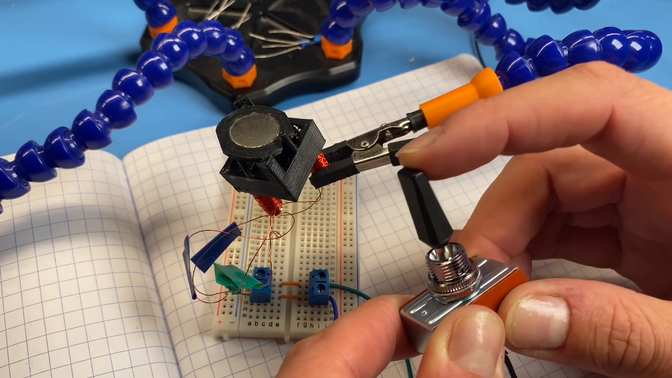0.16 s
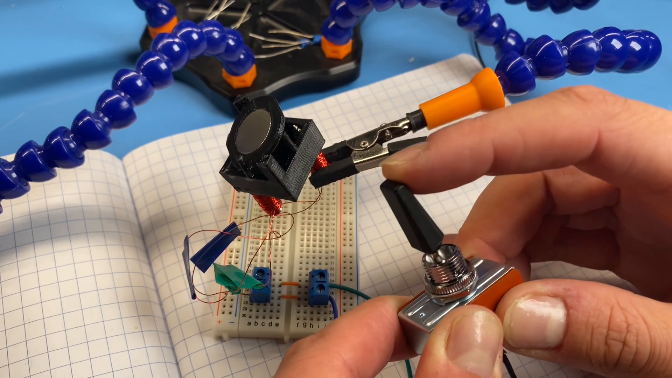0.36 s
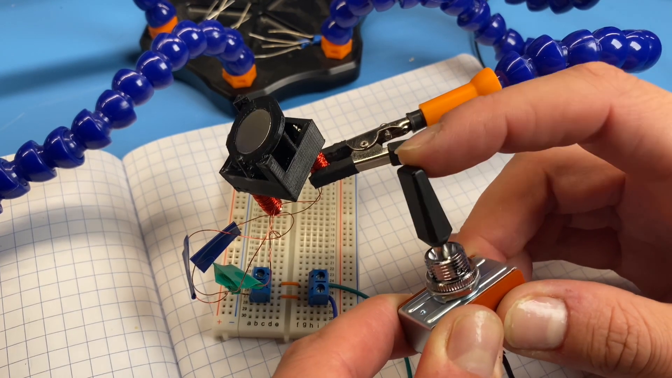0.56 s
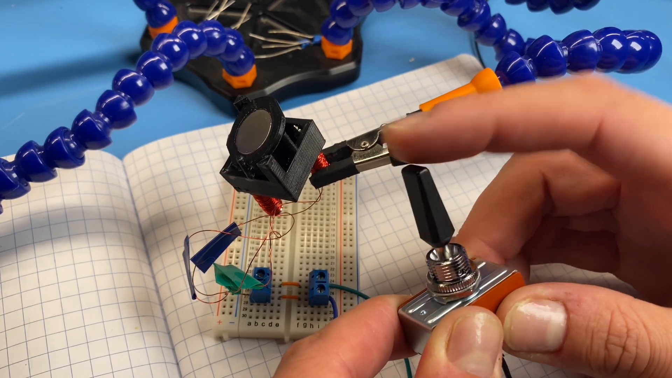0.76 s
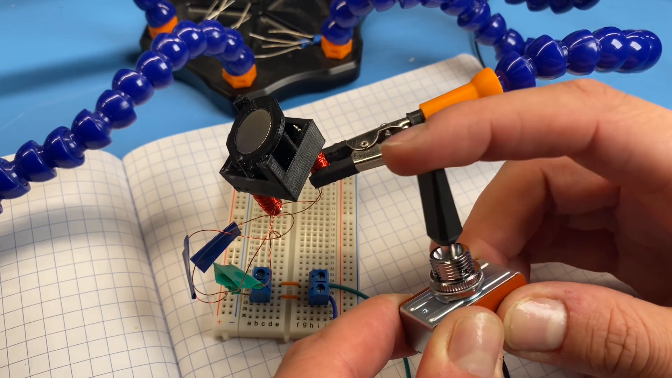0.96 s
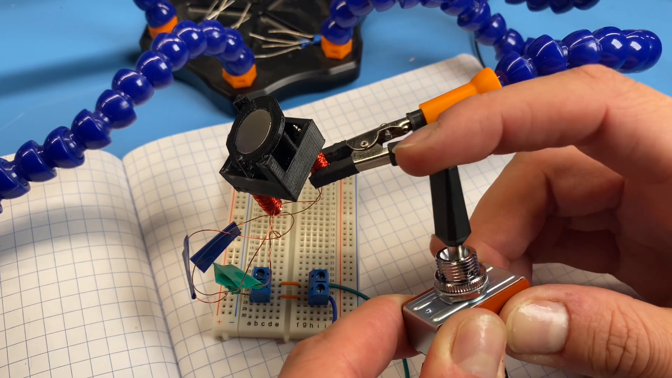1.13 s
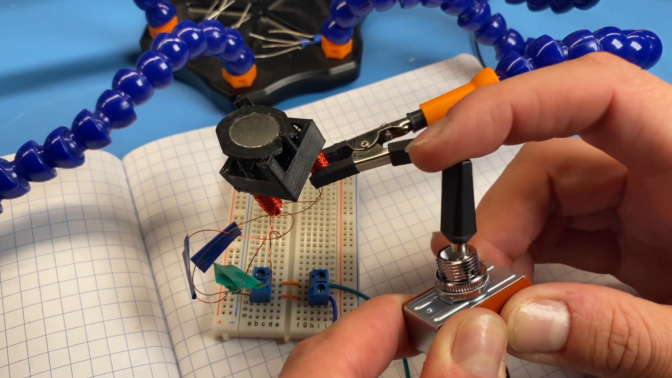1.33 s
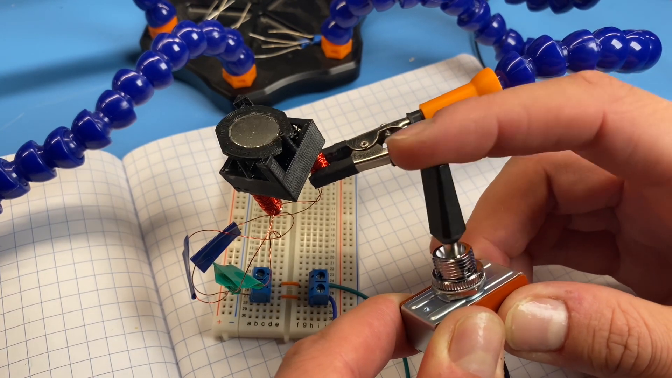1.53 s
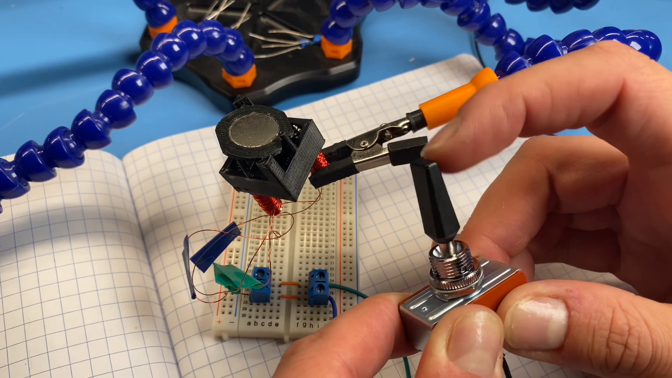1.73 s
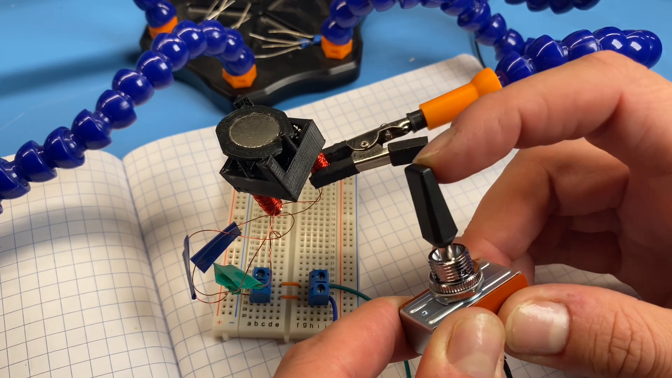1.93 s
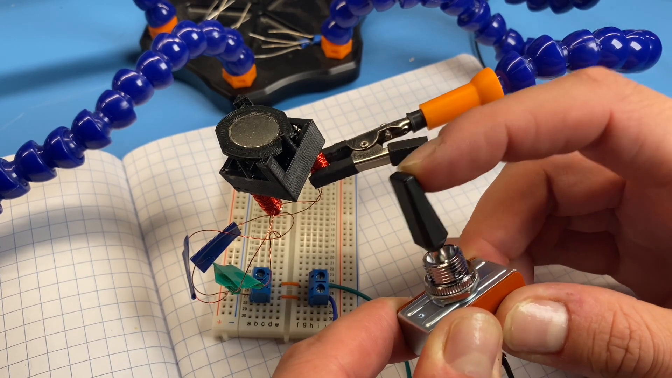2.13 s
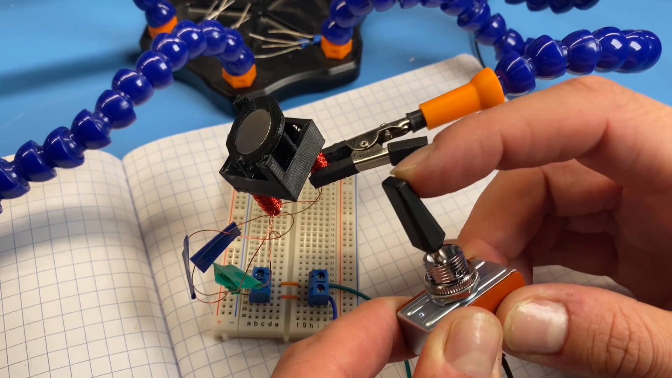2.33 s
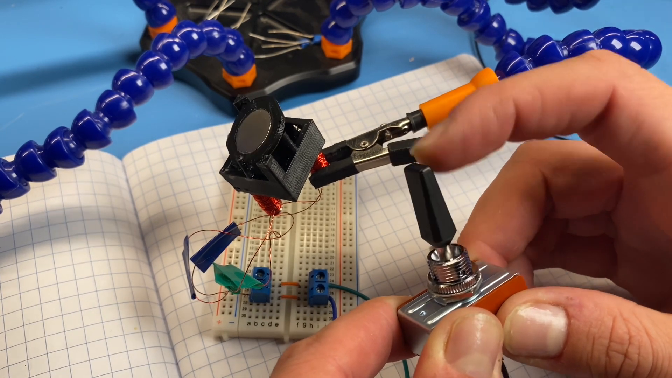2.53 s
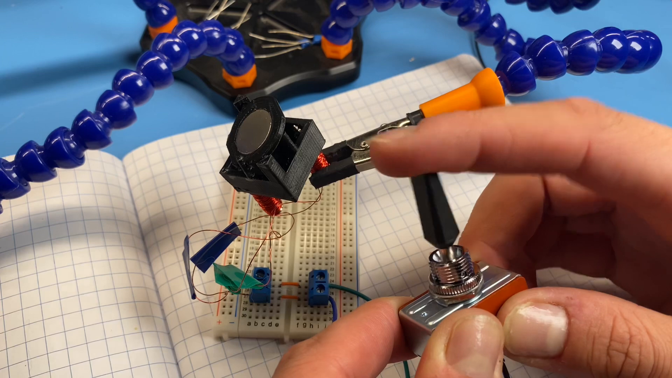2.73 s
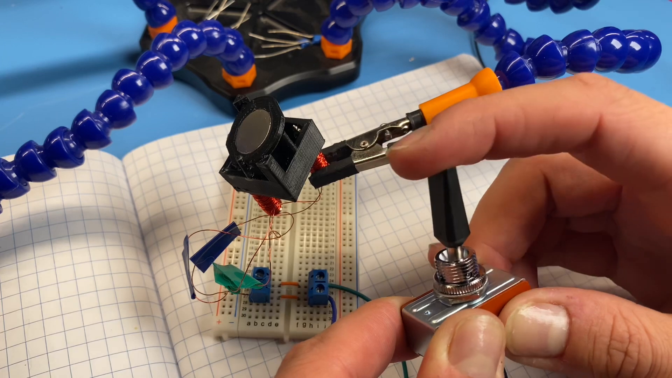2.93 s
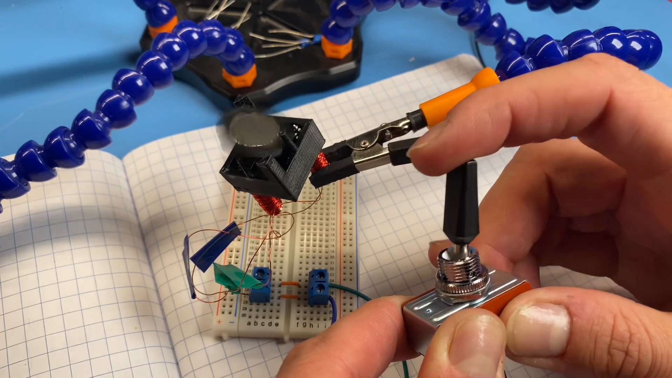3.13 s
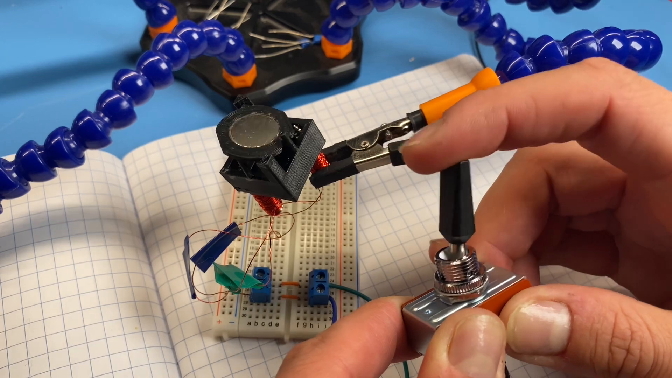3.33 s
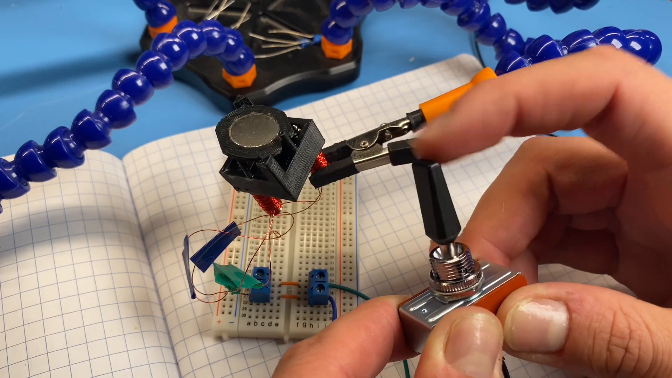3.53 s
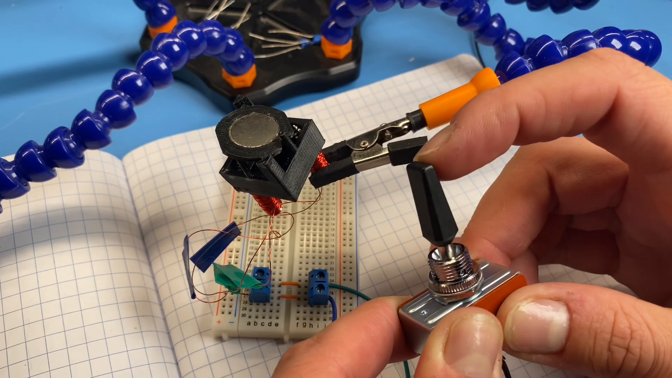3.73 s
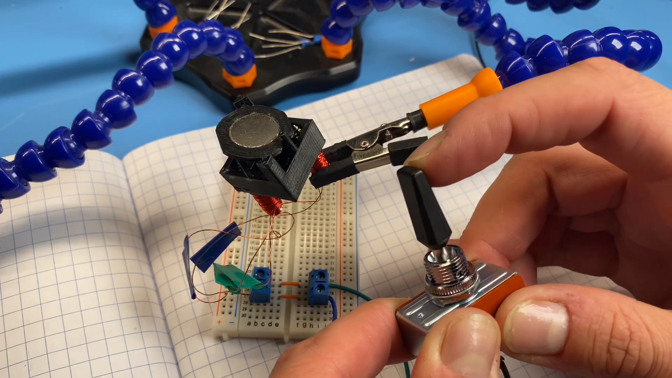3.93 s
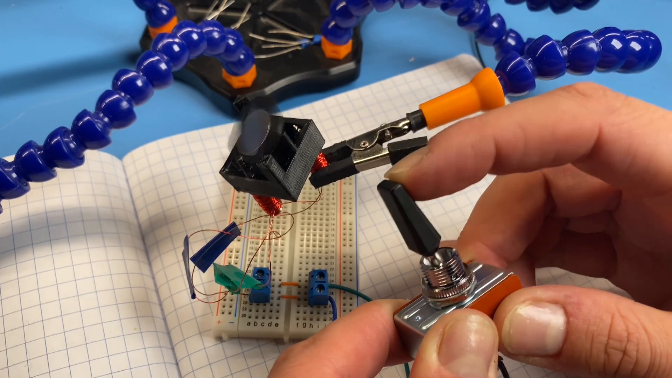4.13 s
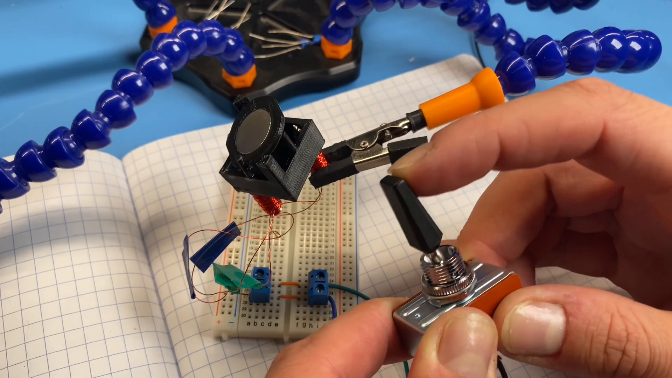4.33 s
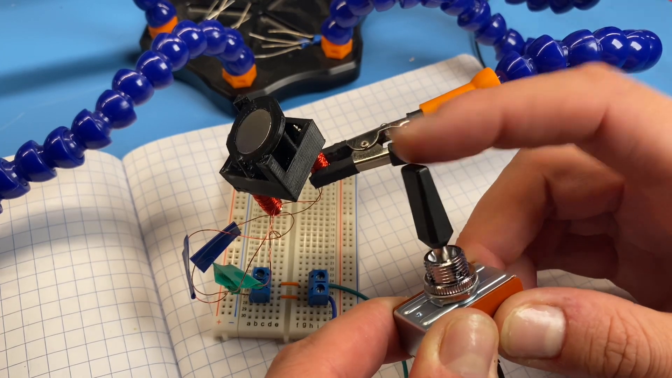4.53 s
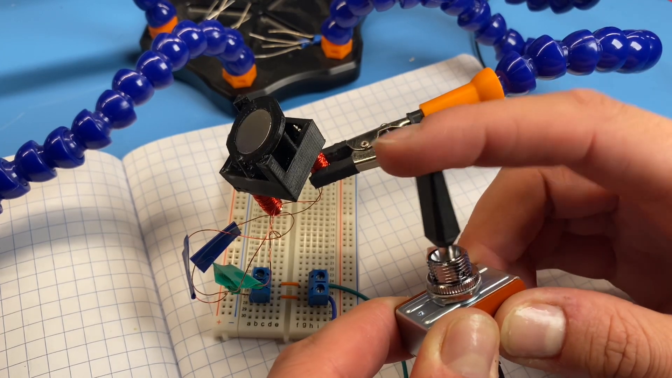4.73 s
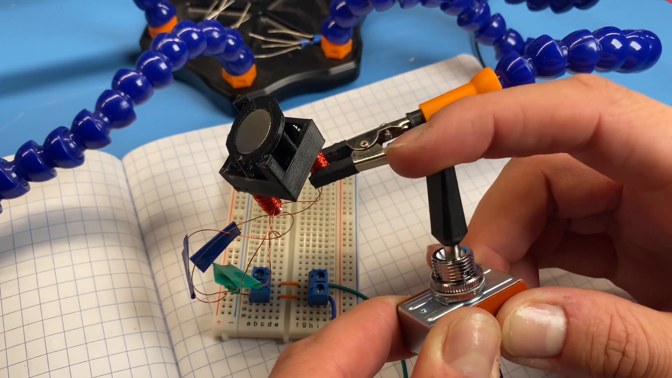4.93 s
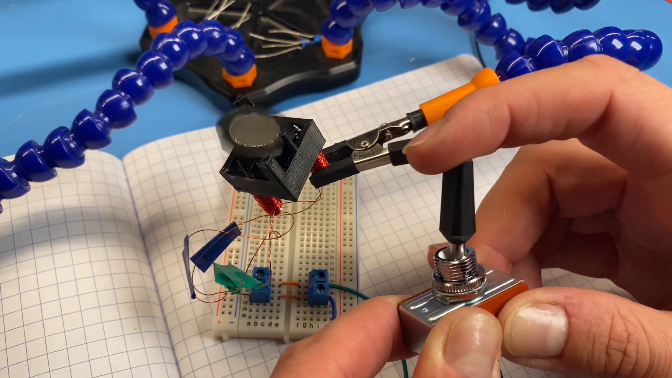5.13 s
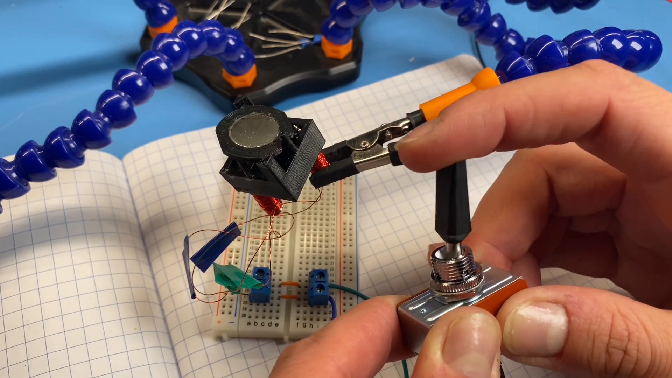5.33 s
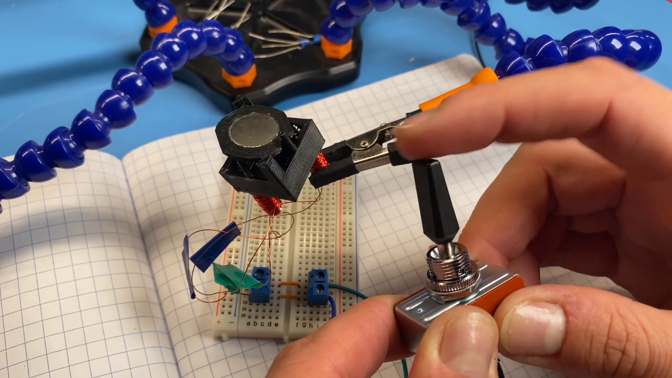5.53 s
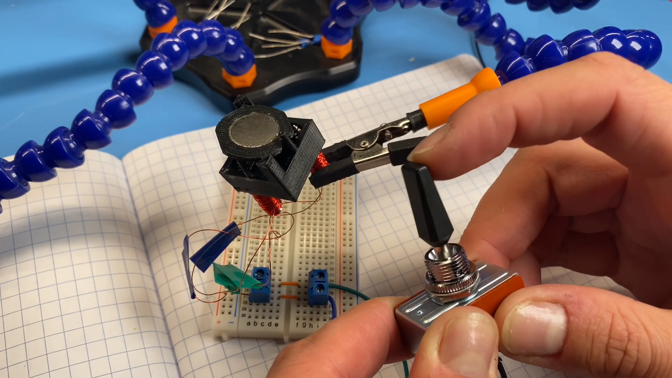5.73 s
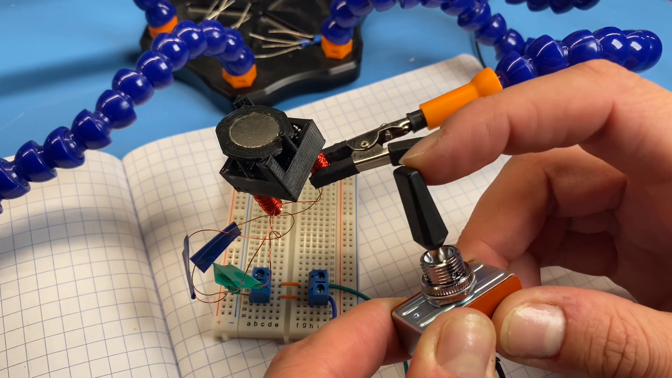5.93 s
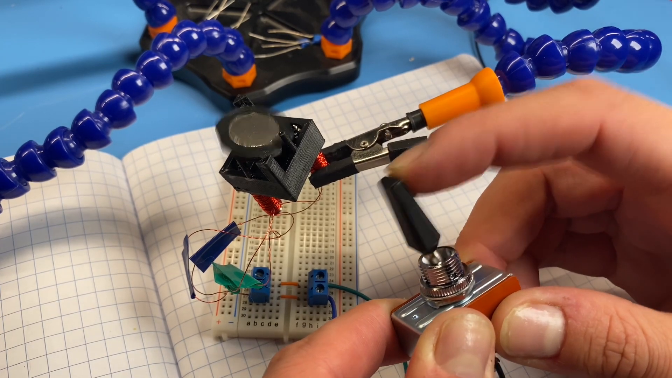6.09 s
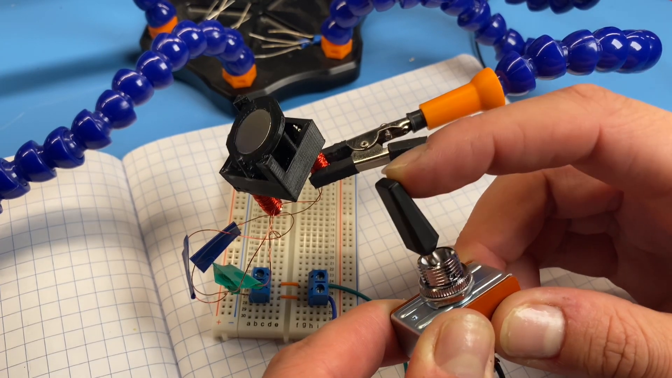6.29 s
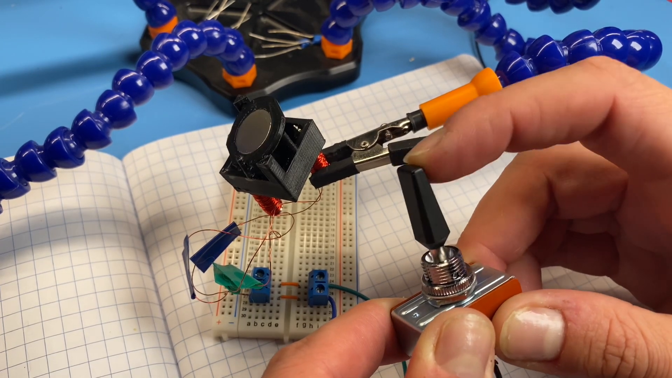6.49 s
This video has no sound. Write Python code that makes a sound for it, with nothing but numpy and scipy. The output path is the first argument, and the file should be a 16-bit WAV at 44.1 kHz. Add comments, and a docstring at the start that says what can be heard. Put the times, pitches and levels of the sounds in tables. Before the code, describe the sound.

A toggle switch is flicked back and forth close by, each throw followed by the sharp metallic clack of a small disc, over faint hum.

```python
"""Toggle switch and swinging disc on a desk

A finger rocks a toggle switch close to a phone on a desk; each throw makes a small magnetic disc swing over,
scrape on its pivot, land on its stop and bounce. Switch and disc are gritty noise bursts ringing resonances.
The blows shake the clamp arm and the desk, heard as lower resonances and short low thuds.
A small room answers with decaying noise tails; a wavering hum and soft, lumpy room noise lie underneath.
"""
import sys
import numpy as np
from scipy import signal
from scipy.fft import rfft, irfft, next_fast_len
from scipy.io import wavfile
from scipy.ndimage import uniform_filter1d, map_coordinates

SR = 44100
rng = np.random.default_rng(int(sys.argv[2]) if len(sys.argv) > 2 else 0)


def transcribe(signal):
    """Save signal, clipped to [-1, 1], as a 16-bit WAV file at the path in sys.argv[1]."""
    frames = np.atleast_2d(signal).T
    limited = np.clip(frames, -1, 1)
    pcm = np.round(limited * 32767).astype(np.int16)
    wavfile.write(sys.argv[1], SR, pcm)


def voltage_ratio(level):
    """Linear amplitude factor for a level in decibels (scalar or array-like)."""
    return 10 ** (np.asarray(level, float) / 20)


N = 293509

# landings of the disc, hard or soft on the way out, then on the way back: landing_s, level_db, desk_thud_db
HARD_LANDINGS = [(1.1906, -13, -47.5), (3.0717, -12.5, -46.5), (5.0687, -12.5, -48)]
SOFT_LANDINGS = [(0.2293, -15, -43.5), (2.139, -15, -46.5), (4.0703, -14.5, -47.5), (6.0724, -14, -46.5)]
BACK_LANDINGS = [(0.5509, -24, -59), (1.489, -24, -58), (2.4182, -24, -65), (3.4081, -23.5, -57),
                 (4.382, -23.5, -50), (5.3876, -23.5, -59), (6.4138, -24, -57)]
# lever thrown to either end, rebounding once:
# start_s, treble_db, rebound_after_s, rebound_db (against the snap), hum_swell_db
LEVER_THROWS = [(0.176, -22.5, 0.0045, -13.5, -64.5), (1.132, -26, .0078, -8.5, -52.5),
                (2.086, -24, .0054, -14, -63), (3.0117, -26, .0075, -7.5, -48),
                (4.0178, -26, .0067, -12, -58), (5.0104, -24.5, 0.0098, -8.5, -58.5),
                (6.02, -26, 0.0088, -14, -63.5)]
# lever pushed off an end, contacts dragging apart:
# start_s, treble_db, knock_db (against treble), t60_s, hum_swell_db
LEVER_RETURNS = [(0.4985, -31, -26.5, 0.015, -58), (1.44, -34, -20, 0.01, -53),
                 (2.365, -31.5, -27, 0.022, -65), (3.3537, -29.5, -10, 0.017, -65),
                 (4.3294, -33, -22.5, 0.02, -62), (5.333, -27.5, -7.5, 0.0098, -50.5),
                 (6.361, -34.5, -12, 0.017, -58.5)]
# lever let go into the middle notch: start_s, treble_db, middle_db, spring_db (both against treble), hum_swell_db
LEVER_RELEASES = [(0.8591, -35.5, -8, -1.5, -61.5), (1.8234, -31, -8, -6.5, -58),
                  (2.7192, -43.5, -16, -9, -72), (3.713, -35, -6, 4, -59), (4.675, -48, -6, 1, -67),
                  (5.6744, -34, -18, 2, -53.5)]


def unit(x):
    """Scaled to rms 1."""
    return x / np.sqrt(np.mean(x ** 2) + 1e-20)


def along(points, hz):
    """Reads a curve of (Hz, value) points on a log frequency axis."""
    f, v = np.transpose(points)
    return np.interp(np.log(hz + 1), np.log(f + 1), v)


def wobble(rate):
    """A smooth random curve, rate knots a second."""
    knots = rng.standard_normal(int(N * rate / SR) + 4)
    return map_coordinates(knots, [np.arange(N) * rate / SR])


def filtered(x, response):
    """x times a complex response of frequency."""
    m = next_fast_len(x.shape[-1] + SR // 2)
    return irfft(rfft(x, m) * response(np.fft.rfftfreq(m, 1 / SR)), m)[..., :N]


def ringing(x, peaks, blur=7.5, top_hz=19000):
    """x through a set of resonances; a third row with blurred resonances is what leaves in other directions."""
    def response(f):
        def modes(wider):
            return [voltage_ratio(db) * 1j * f * width * wider / (centre ** 2 - f * f + 1j * f * width * wider)
                    for centre, width, db in peaks]

        sharp = sum((-1) ** k * mode for k, mode in enumerate(modes(1.0)))  # neighbours in opposite sign
        blurred = np.sqrt(sum(np.abs(mode) ** 2 for mode in modes(blur)))
        edge = 1 / (1 + (f / top_hz) ** 20)
        return [unit(np.abs(h * edge)) * np.exp(1j * np.angle(h)) for h in (sharp, sharp, blurred)]
    return filtered(x[[0, 1, 0]], response)


def contacts(rows, grain_db=3.5):
    """Two unrelated gritty bursts for each (s, dB, rise s, t60 s), each with the energy its shape calls for."""
    out = np.zeros((2, N + SR))
    t = np.arange(SR // 5) / SR
    for s, db, rise, t60 in rows:
        shape = voltage_ratio(db - 60 * t / t60) * (1 - np.exp(-(t / rise) ** 2))
        lumps = unit(uniform_filter1d(rng.standard_normal(len(t)), size=24))
        grit = voltage_ratio(grain_db * lumps)  # uneven tiny impacts
        burst = shape * grit * rng.standard_normal((2, len(t)))
        burst *= np.linalg.norm(shape) / np.linalg.norm(burst, axis=1, keepdims=True)
        out[:, round(s * SR):][:, :len(t)] += burst
    return out[:, :N]


def swings(landings, steps):
    """The contacts of one swing repeated at every landing, each starting one rise time early."""
    return contacts([(s + after - rise, db + step_db, rise, t60)
                     for s, db, _ in landings for after, step_db, rise, t60 in steps])


def hum():
    """A wavering mains hum and its octave, swelling and sinking back after each throw, return and release."""
    hum_hz, hum_db, waver_db, octave_db = 119.8, -71.5, 4, -19
    swell_rise_s, swell_t60_s, throw_late_s = 0.035, 0.75, 0.029  # the swell comes later after a throw
    t = np.arange(N) / SR
    size = voltage_ratio(hum_db + waver_db * wobble(7.0))
    swells = [(row[0] + throw_late_s, row[4]) for row in LEVER_THROWS]
    swells += [(row[0], row[4]) for row in LEVER_RETURNS + LEVER_RELEASES]
    for s, db in swells:
        since = np.maximum(t - s, 0)
        size = size + voltage_ratio(db - 60 * since / swell_t60_s) * (1 - np.exp(-(since / swell_rise_s) ** 2))
    turn = 2 * np.pi * hum_hz * t + 0.4 * wobble(7.8)
    return size * (np.sin(turn) + voltage_ratio(octave_db) * np.sin(2 * turn))


def background():
    """Soft room noise: shaped random air, its rumble rising and falling in lumps, with the hum on top."""
    # relative spectrum of the room noise: pitch_hz, density_db (per Hz)
    air_spectrum = [(12, -64.5), (22, -32), (40, -10.5), (60, -3.5), (92, -11), (122, -8), (150, -14.5),
                    (250, -19), (450, -29), (830, -31), (1770, -41.5), (5000, -44.5), (11000, -51),
                    (13000, -57), (17000, -64.5)]
    air_db, rumble_lumps_db = -67.5, 3.5
    air = unit(filtered(rng.standard_normal((2, N)), lambda hz: voltage_ratio(along(air_spectrum, hz))))
    rumble = filtered(air, lambda hz: 1 / (1 + (hz / 250) ** 4))
    hiss = voltage_ratio(0.8 * wobble(1.7)) * (air - rumble)
    lumpy = voltage_ratio(0.56 * wobble(3.5) + rumble_lumps_db * wobble(7.2)) * rumble
    bed = voltage_ratio(air_db) * (hiss + lumpy)
    bed[0] += hum()
    return bed


def room(sound):
    """Each frequency dies at its own speed; every short stretch gets a noise tail of its own."""
    # decay of the room: pitch_hz, t60_s
    decay = [(300, 0.12), (1500, 0.21), (4000, .28), (9000, 0.21), (15000, 0.1)]
    out, step = np.zeros((2, N + SR)), SR // 8
    for i in range(0, N, step):
        hz, t, z = signal.stft(rng.standard_normal((2, SR // 2)), SR, nperseg=256)
        fade = voltage_ratio(-60 * t / along(decay, hz)[:, None])
        tail = signal.istft(z * fade, SR, nperseg=256)[1]
        wet = signal.fftconvolve(sound[:, i:i + step], tail / np.linalg.norm(tail[0]), axes=1)
        out[:, i + 200:][:, :wet.shape[1]] += wet  # 200 samples later than the direct sound
    return out[:, :N]


def thuds(landings, steps):
    """Short low pushes into the desk as the disc starts and stops, and on the way out a brief tone of its frame."""
    scatter_db, detune = 1.5, 0.008  # from one push to the next; detune is a share of the pitch
    out = np.zeros(N + SR)
    t = np.arange(-SR // 10, SR // 10) / SR
    for s, _, thud_db in landings:
        for after, step_db, hz, length in steps:
            db = thud_db + step_db + scatter_db * rng.standard_normal()
            pitch = hz * (1 + detune * rng.standard_normal())
            push = voltage_ratio(db) * np.exp(-(t / length) ** 2) * np.cos(2 * np.pi * pitch * t)
            out[round((s + after) * SR) - SR // 10:][:len(t)] += push
    return out[:N]


def arm():
    """The swinging weight shakes the frame, clamp arm and desk; the hand jolts the desk at each release."""
    # resonances of the clamp arm: pitch_hz, width_hz, level_db
    arm_modes = [(67.4, 67, -1.5), (112, 17, 2.5), (162, 45, -4.5), (254, 45, -3.5), (300, 36, -7),
                 (403, 32, 0), (463, 450, -11)]
    # pushes on the arm, out and back: from_landing_s, level_db (against landing), rise_s, t60_s
    out_pushes = [(-.045, -35, .012, 0.36), (0, -33, 0.0043, 0.2)]
    back_pushes = [(-.05, -28.5, 0.0053, 0.069), (-.025, -31, .005, 0.36)]
    # low thuds and frame tone of one swing: from_landing_s, level_db (against desk thud), pitch_hz, length_s
    hard_thuds = [(-.036, -9, 38, 0.0058), (-0.03, -6, 39, .01), (0.011, -5, 70, 0.0059),
                  (0.045, 0, 58, 0.0022), (-0.022, -2, 655, 0.018)]
    soft_thuds = [(-.021, 2.5, 32, 0.0095), (0.033, -2, 71, 0.01), (-0.0085, -6.5, 655, 0.028)]
    back_thuds = [(0.02, -4, 61.9, 0.012)]
    pushes = swings(HARD_LANDINGS + SOFT_LANDINGS, out_pushes) + swings(BACK_LANDINGS, back_pushes)
    jolts = contacts([(row[0], -59.5, 0.004, 0.093) for row in LEVER_RELEASES])
    shake = ringing(pushes + jolts, arm_modes)[:2]
    shake[0] += thuds(HARD_LANDINGS, hard_thuds) + thuds(SOFT_LANDINGS, soft_thuds)
    shake[0] += thuds(BACK_LANDINGS, back_thuds)
    return shake


def snaps():
    """Every contact of the lever as (s, treble dB, middle, knock, spring against treble dB, t60 s)."""
    # ticks of the loose lever under the finger:
    # start_s, treble_db, middle_db, knock_db, spring_db (last three against treble)
    ticks = [(0.041, -45, -18, -14, -20.5), (0.4476, -74, -13, -8, 6), (1.6838, -48.5, -7, -14, -36),
             (1.9119, -47.5, -16.5, -11.5, -33), (2.691, -50.5, -12, -33.5, -22),
             (3.7525, -48, -23, -13, -25.5), (3.7569, -42, -20.5, -12, -30.5),
             (4.652, -59.5, -14.5, -22, -25), (5.7516, -52.5, -23, -8, -11.5)]
    throw_tone = (-20, -28.5, -18.5, 0.0212)  # middle, knock, spring against treble dB, t60 s
    rebound_tone = (-17, -18, -17.5, 0.0342)
    return_middle_db, return_spring_db = -13.5, -11.5
    seat_s, seat_db, seat_knock_db = 0.0022, 0.5, -6.5  # a return clicks twice; the first click knocks less
    rows = []
    for s, db, after, less_db, _ in LEVER_THROWS:
        rows.append((s, db, *throw_tone))
        rows.append((s + after, db + less_db, *rebound_tone))
    for s, db, knock_db, t60, _ in LEVER_RETURNS:
        rows.append((s, db, return_middle_db, knock_db + seat_knock_db, return_spring_db, t60))
        rows.append((s + seat_s, db + seat_db, return_middle_db, knock_db, return_spring_db, t60))
    for s, db, middle_db, spring_db, _ in LEVER_RELEASES:
        rows.append((s, db, middle_db, -22.5, spring_db, 0.012))
    return rows + [(*tick, 0.011) for tick in ticks]


def switch():
    """Each snap excites contacts, case, lever and spring at strengths of its own; a weaker rattle dies more slowly."""
    # resonances of the switch, by part: pitch_hz, width_hz, level_db
    treble_modes = [(6570, 5100, -7), (8940, 3600, -4.5), (10700, 790, 4.5), (12400, 4700, 3),
                    (13730, 2600, 7.5), (14400, 1200, 0)]
    middle_modes = [(2490, 1000, 0.0057), (3800, 1300, 0)]
    knock_modes = [(310, 440, -7), (856, 240, 0.5), (1720, 340, -3)]
    spring_modes = [(4706, 380, -2), (5110, 220, -6)]
    # the spring already ringing at the start: start_s, level_db, rise_s, t60_s
    opening_ring = [(0, -62, 0.00012, 0.087)]

    def part(column, gain_db):
        rise = 0.0004
        blows = []
        for row in snaps():
            against_treble_db = row[column] if column > 1 else 0
            blows.append((row[0] - rise, row[1] + against_treble_db + gain_db, rise, row[5]))
        rattle = [(s, db - 20.0, 0.002, 3 * t60) for s, db, _, t60 in blows]
        return contacts(blows + rattle)

    # the spring rings on faintly after a release, well under its snap
    tails = [(s, db + spring_db - 27, 0.004, 0.12) for s, db, _, spring_db, _ in LEVER_RELEASES]
    treble = ringing(part(1, gain_db=0.5), treble_modes)
    middle = ringing(part(2, gain_db=7), middle_modes)
    knock = ringing(part(3, gain_db=5.0), knock_modes)
    spring = ringing(part(4, gain_db=6) + contacts(opening_ring + tails), spring_modes, blur=1.3)
    return treble + middle + knock + spring


def disc():
    """The disc scrapes round its pivot, then strikes one stop or rattles back, duller, on the other."""
    # contacts of one swing, pivot scrapes and blows on the stop:
    # from_landing_s, level_db (against landing), rise_s, t60_s
    hard_scrapes = [(-.044, -16.5, .003, .04), (-.033, -20.5, .004, 0.088)]
    hard_blows = [(0, 1.5, 0.0007, 0.014), (0.0177, -6.5, .0008, .014), (0.025, -19, .001, .02),
                  (.04, -33, 0.0037, 0.042)]
    soft_scrapes = [(-.039, -15.5, 0.0024, 0.039), (-.028, -19, 0.0027, 0.085)]
    soft_blows = [(0, -4.5, 0.00056, 0.022), (0.014, -19.5, 0.0012, 0.029), (.021, -29, .002, .04)]
    back_blows = [(-.027, -3.5, .002, 0.048), (-.02, -6, 0.0011, 0.024), (-.005, -13.5, 0.00074, 0.032),
                  (0, -2.5, .001, 0.026), (.005, -7.5, .001, .05), (.012, -20.5, .006, 0.25),
                  (0.031, -23.5, 0.00091, 0.033)]
    # resonances of the struck stops and the pivot: pitch_hz, width_hz, level_db
    hard_stop = [(1820, 47, -7), (3000, 650, -11), (3580, 360, -2.5), (4190, 170, -1), (6100, 690, -7.5),
                 (7000, 360, -10), (8860, 500, -8), (9850, 360, -2.5), (10900, 320, -2.5),
                 (12200, 1000, -2), (13240, 1500, 0), (13600, 680, -15), (15700, 850, -6.5)]
    soft_stop = [(1450, 1200, -21), (2387, 100, -3.5), (3375, 140, 2.5), (4270, 390, -8.5),
                 (5800, 570, -12.5), (7200, 900, -33), (9210, 120, 2.5), (10860, 830, -0.5),
                 (11600, 320, -6.5), (13000, 780, -3), (15000, 350, -6.5), (15600, 350, -9)]
    back_stop = [(369, 22, -15), (1160, 800, -21), (1744, 235, -11), (2194, 69, -9), (2570, 133, -8),
                 (3540, 510, -19), (5600, 980, -7), (6320, 1900, -7.5), (8700, 840, -3), (9500, 200, 0),
                 (11140, 810, -6), (12450, 300, 1), (14200, 1400, -6.5)]
    pivot = [(1040, 600, -2.5), (1810, 110, 4.5), (2320, 670, -2), (3450, 310, 1), (5220, 270, 7),
             (6000, 340, 3.5), (7800, 2200, 2.5), (10900, 1200, -15), (12500, 5500, -3), (16700, 1900, 2.5)]
    scrape = ringing(swings(HARD_LANDINGS, hard_scrapes) + swings(SOFT_LANDINGS, soft_scrapes), pivot)
    hard = ringing(swings(HARD_LANDINGS, hard_blows), hard_stop, blur=7.8)
    soft = ringing(swings(SOFT_LANDINGS, soft_blows), soft_stop, blur=18.0)
    back = ringing(swings(BACK_LANDINGS, back_blows), back_stop, blur=0.96, top_hz=13970)
    return scrape + hard + soft + back


def microphones(pair, alike, left, lead):
    """Two unrelated signals made a stereo pair; in the treble the left port hears late."""
    ports_hz, ports_s = 6914, 0.00026  # above this pitch the left port is late by this time

    def mix(hz, sign):
        turn = np.arccos(np.clip(along(alike, hz), 0, 1)) / 2
        phase = along(lead, hz) - 2 * np.pi * np.maximum(hz - ports_hz, 0) * ports_s
        port = voltage_ratio(sign * along(left, hz) / 2) * np.exp(0.5j * sign * phase)
        return port * [np.cos(turn), sign * np.sin(turn)]
    return np.array([filtered(pair, lambda hz: mix(hz, sign)).sum(axis=0) for sign in (1, -1)])


def scene():
    """Near sounds keep their direction; room and background arrive from all round."""
    # likeness of the two channels, close by and from all round: pitch_hz, likeness (0-1)
    near_alike = [(100, .96), (350, .65), (700, .6), (1400, .35), (3000, .7), (6300, .4), (8300, .87),
                  (16000, .87)]
    far_alike = [(100, .95), (300, .65), (800, .3), (5000, .15), (8300, .65), (12000, .85), (16000, .5)]
    # balance of the near sounds: pitch_hz, left_over_right_db
    near_left = [(1200, -.3), (3000, 5.5), (5000, 1), (8000, 0)]
    # phase of left against right, ahead of the port delay: pitch_hz, left_lead_rad
    near_lead = [(1200, 0), (2500, 1.1), (5000, .8), (6800, -1.05)]
    far_lead = [(5000, 0), (6800, -1.05)]
    close = switch() + disc()
    near = close[:2] + arm()
    far = voltage_ratio(-17.0) * room(close[2:]) + background()
    near_pair = microphones(near, near_alike, near_left, near_lead)
    far_pair = microphones(far, far_alike, [(1000, 0.4)], far_lead)  # left 0.4 dB louder
    return near_pair + far_pair


def top_cut(x):
    """Nothing passes above the cut-off."""
    return signal.sosfilt(signal.butter(12, 17040, fs=SR, output="sos"), x)


def record(dry):
    """The top edge of the sound: everything above top_hz fades by 0.04 dB a Hz."""
    top_hz = 16030
    mix = filtered(dry, lambda hz: voltage_ratio(-0.04 * np.maximum(hz - top_hz, 0)))
    return top_cut(mix)


dry = scene()
out = record(dry)
transcribe(out)
```